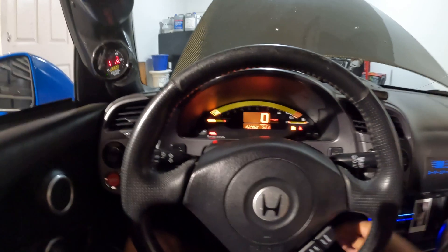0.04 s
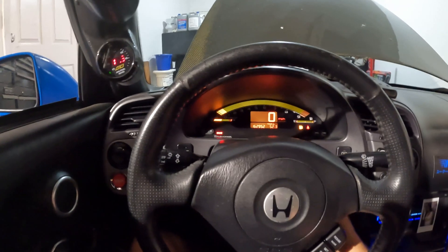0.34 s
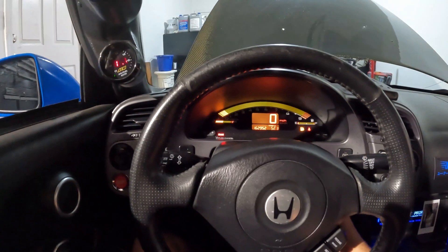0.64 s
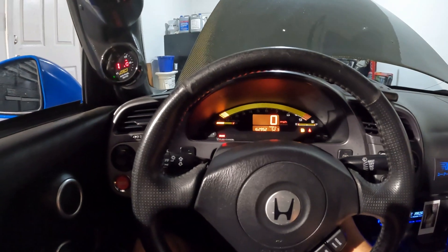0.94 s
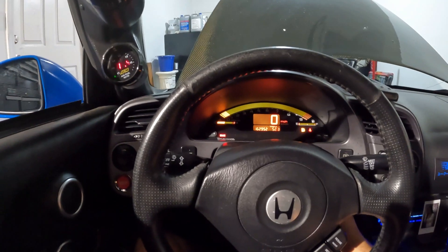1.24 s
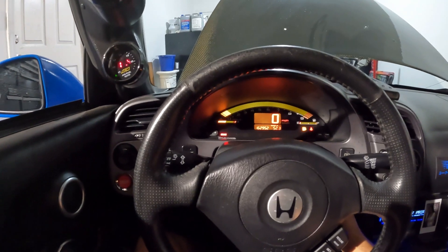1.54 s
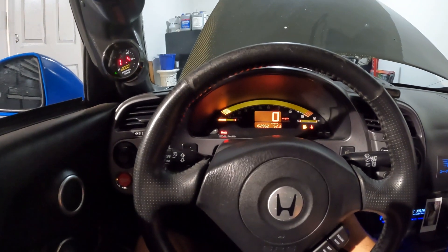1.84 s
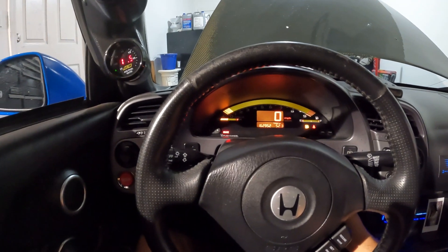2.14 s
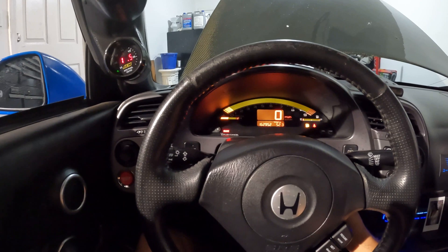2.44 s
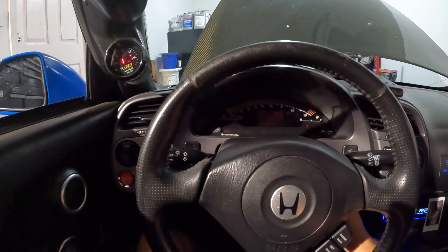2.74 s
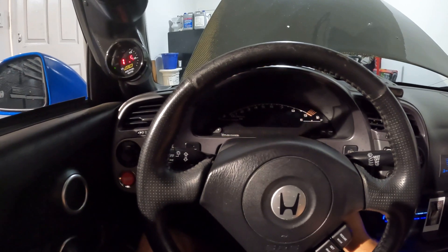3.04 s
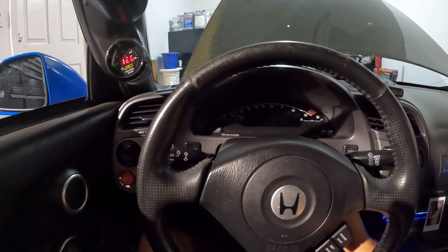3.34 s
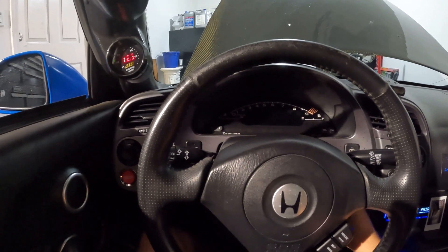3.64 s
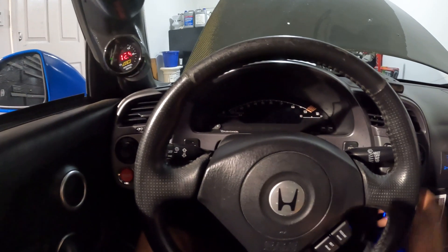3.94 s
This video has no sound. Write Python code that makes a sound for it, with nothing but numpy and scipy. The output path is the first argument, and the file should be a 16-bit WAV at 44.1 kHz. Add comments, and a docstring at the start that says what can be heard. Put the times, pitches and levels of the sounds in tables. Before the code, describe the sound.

A car engine idles with a low hum, then a key clicks and it stops.

```python
"""Idling car, switched off

A four-cylinder car in a garage, heard close in stereo from the driver's seat as a low, steady hum.
Firings boom in the cabin, the engine's drives whine, whirr and rustle, and a hiss follows the speed.
Near 2.9 s the ignition switch clicks off in the steering column. The slack gears chatter and the
engine runs down in about a second, rocking on its mounts."""
import sys
import numpy as np
from scipy import signal
from scipy.fft import rfft, irfft
from scipy.io import wavfile
from scipy.ndimage import uniform_filter1d

SR = 44100
rng = np.random.default_rng(int(sys.argv[2]) if len(sys.argv) > 2 else 0)


def store_wav(level_fs):
    """Save 16-bit WAV to argv[1]."""
    pcm = np.round(np.clip(np.atleast_2d(level_fs), -1, 1) * 32767)
    wavfile.write(sys.argv[1], SR, pcm.T.astype(np.int16))


N = 176400
TIME_S = np.arange(N) / SR

# engine speed: time_s, firings_per_s
FIRING_RATE = [(0.0, 35.0), (0.35, 34.92), (0.55, 35.5), (0.68, 35.12), (0.85, 35.78), (1.15, 36.31),
               (1.8, 35.44), (2.0, 35.28), (2.2, 35.1), (2.45, 35.62), (2.82, 35.72), (2.9, 31.75),
               (3.0, 28.17), (3.15, 22.98), (3.5, 13.5), (3.95, 2.0)]
# strength of the exhaust pulses: time_s, relative_db
PULSE_STRENGTH = [(0, -1.8), (1.15, -1), (2.1, -2), (2.82, -1), (2.93, 1), (3.14, 2), (3.25, -5),
                  (3.5, -20), (3.68, -34), (4.0, -29)]
# response of exhaust and cabin to one pulse: frequency_hz, relative_db
CABIN_RESPONSE = [(10, -29), (19, -0.5), (26, 2.5), (36, 3), (50, -7.5), (70, 2), (88, -15.5), (103, -23),
                  (110, -8), (142, -21), (178, -19), (213, -26), (250, -24.5), (285, -38), (355, -32),
                  (430, -55.5), (650, -23.5), (1200, -60.5)]
# uneven rumble under the firings: frequency_hz, relative_db
RUMBLE_SPECTRUM = [(12, -34.5), (25, -44), (55, 7), (90, -27), (125, 3.5), (190, -8.5), (260, -8.5),
                   (400, -28.5), (800, -52)]
# tones of crank and gears: cycles_per_crank_turn, level_db, flutter_share
GEAR_TONES = [(9, -46.5, 0.3), (11, -46.5, 0.3), (13, -49.5, 0.25), (26, -39, 0.096), (28, -52.5, 0.77),
              (52, -49, 0.51), (56, -56, 0.36), (60, -61.5, 0.41)]
# tones of the belt-driven pulleys: cycles_per_crank_turn, level_db, flutter_share
PULLEY_TONES = [(22.3, -50, .4), (35.5, -56, .5), (41.8, -57, .5)]
# resonances that the moving parts ring: pitch_hz, width_hz, level_db, throb_share
WHIRR_MODES = [(486.7, 93, -44.5, 0), (955.3, 152, -47, 0), (1069, 106, -53.5, 0.2), (1740, 370, -55, 0.6)]
# rustle of valve gear and belts: frequency_hz, relative_db
RUSTLE_SPECTRUM = [(100, 1.5), (260, -4.5), (400, 0), (560, -2.5), (800, -8), (1060, -6), (1280, -9.5),
                   (1600, -3.5), (1900, -4.5), (2400, -9.5), (2750, -8), (3300, -14.5), (5000, -18),
                   (8000, -44), (14000, -47)]
# hiss of belts and air: frequency_hz, relative_db
HISS_SPECTRUM = [(100, -2), (400, 0.5), (750, 4), (1100, 6), (2000, 0), (3500, -0.5), (4400, 0), (5600, -1),
                 (6600, -4.5), (7800, -7.5), (8600, -16), (10500, -15), (11300, -19), (12800, -16.5),
                 (13600, -41)]
# the ignition switch's snap and bounces: start_s, relative_db
SWITCH_CONTACTS = [(2.8989, 0), (2.9020, -7), (2.9046, -5), (2.9060, -6), (2.9088, -10)]
# resonances that each contact rings: pitch_hz, width_hz, relative_db
SWITCH_MODES = [(5540, 440, 0), (5800, 420, -11.5), (7000, 310, -8.5), (7400, 540, -3.5), (8740, 290, -16),
                (10700, 520, -12), (12340, 300, -19)]
# the lock barrel's knock in the steering column: frequency_hz, relative_db
KNOCK_SPECTRUM = [(300, -4), (750, -7), (1100, -2), (1900, 0.5), (2700, -7), (4200, -5.5), (8000, -27)]
# last compressions of the coasting engine: start_s, relative_db
COMPRESSIONS = [(3.17, -16.5), (3.282, -16.5), (3.37, -20.5), (3.433, -16), (3.544, -21), (3.654, -32),
                (3.745, -28.5), (3.87, -27.5)]
# low modes of the car's body: pitch_hz, width_hz, relative_db
BODY_MODES = [(25.4, 11.6, 1), (67.45, 13.8, -3), (113.8, 16, -14), (162.3, 27, -14)]
# stereo image at the seat: frequency_hz, correlation, left_minus_right_db
STEREO_IMAGE = [(148, 0.78, 1.5), (366, 0.85, 2), (670, 0.83, 4), (1220, 0.69, 5), (2580, 0.2, 4),
                (4540, 0.77, 1), (7400, 0.53, 4), (13000, 0.32, 8)]

UNLOAD_S, CUT_S, CUT_FADE_S = 2.81, 2.87, 0.12  # gears unload, firing stops; time each takes to set in


def undb(db):
    return 10 ** (np.asarray(db) / 20)


def unit(x):
    return x / np.sqrt(np.mean(x ** 2))


def noise():
    return rng.standard_normal((2, N))


def since(start_s):
    return np.maximum(TIME_S - start_s, 0)


def curve(rows):
    """Straight lines through rows of time_s, value."""
    return np.interp(TIME_S, *np.array(rows).T)


def per_bin(rows, column=1):
    """A table column read on a log-frequency axis, for a transform of 2 N points."""
    rows = np.array(rows)
    bin_hz = np.arange(N + 1) * SR / (2 * N)
    return np.interp(np.log(bin_hz + 1), np.log(rows[:, 0]), rows[:, column])


def colour(x, rows):
    """Causal filter through rows of frequency_hz, relative_db; the result has an RMS of 1."""
    cepstrum = irfft(np.log(undb(per_bin(rows))))
    cepstrum[1:N] *= 2
    cepstrum[N + 1:] = 0
    running = np.concatenate([x, x[..., ::-1]], axis=-1)  # the sound is already under way at the start
    return unit(irfft(rfft(running) * np.exp(rfft(cepstrum)))[..., :N])


def resonate(x, hz, width):
    """A steep-sided resonance: the same band-pass twice."""
    band = signal.iirpeak(hz, hz / width, fs=SR)
    return signal.lfilter(*band, signal.lfilter(*band, x))


def ringing(t, hz, width):
    """A struck mode: it swells briefly and dies away."""
    age = np.pi * width * t
    return age * np.exp(1 - age) * np.sin(2 * np.pi * hz * t)


def wander(rate_hz):
    """Smooth random drift with an RMS of 1."""
    hold = int(SR / rate_hz)
    steps = np.repeat(rng.standard_normal(400)[np.arange(N // hold + 1) % 400], hold)
    return unit(uniform_filter1d(uniform_filter1d(steps, hold), hold)[:N])


def strikes(times, sizes):
    """Impulses at the given times, each shared between two samples."""
    at = np.clip(times * SR, 0, N - 2)
    i = at.astype(int)
    return np.bincount(i, sizes * (1 - at + i), N) + np.bincount(i + 1, sizes * (at - i), N)


def spread(pair):
    """Turns two unrelated sounds into a left and a right that are alike in the bass."""
    mid, side = rfft(pair, 2 * N)
    alike = np.clip(per_bin(STEREO_IMAGE), 0, 1)
    sign = np.array([[1], [-1]])
    channels = mid * np.sqrt((1 + alike) / 2) + sign * side * np.sqrt((1 - alike) / 2)
    balance = undb(sign * per_bin(STEREO_IMAGE, column=2) / 2)
    return irfft(channels * balance)[:, :N]


def exhaust(firings, speed, jitter_cycles=0.004, overtone_loss_db=-1.15):
    """A pulse per firing booms in the cabin over a faint rumble; without ignition it turns round."""
    angle = 2 * np.pi * (firings + jitter_cycles * wander(30.03))
    coasting = np.minimum(since(CUT_S) / CUT_FADE_S, 1)
    pulses = sum(np.cos(k * angle) * undb(overtone_loss_db * (k + 0.5) * coasting) for k in range(1, 13))
    lope = 1 + 0.02 * (np.cos(angle / 2) + np.sin(angle / 4))  # the four cylinders differ
    strength = undb(curve(PULSE_STRENGTH) + 0.29 * wander(26.66))
    boom = colour(pulses * lope * strength, CABIN_RESPONSE)
    rumble = colour(rng.standard_normal(N), RUMBLE_SPECTRUM) * speed ** 1.17
    return boom * undb(-15) + rumble * undb(-38)


def whine(firings, fade_db_per_s=132):
    """Fluttering gear and pulley tones, locked to the crank, which turns once per two firings."""
    crank = np.pi * firings
    tones = np.zeros(N)
    for order, db, flutter in GEAR_TONES + PULLEY_TONES:
        in_phase = (1 + flutter * wander(22.14)) * np.sin(order * crank)
        quadrature = flutter * wander(20) * np.cos(order * crank)
        tones += undb(db) * (in_phase + quadrature)
    throb = 1 + 0.026 * np.cos(2 * crank)
    fade = undb(-fade_db_per_s * since(UNLOAD_S))
    return spread(np.array([tones * throb * fade, np.zeros(N)]))


def whirr(throb, speed):
    """Moving parts ring noisy resonances; the upper ones throb with the firings."""
    bands = sum(undb(db) * unit(resonate(noise(), hz, 0.64 * width) * (1 + depth * throb))
                for hz, width, db, depth in WHIRR_MODES)
    return bands * speed ** 1.8


def valve_gear(firings, throb, speed, tick_decay_s=0.0043):
    """Valve gear and belts rustle, and the valves tick unevenly, four times per firing."""
    rustle = colour(noise() * (1 + 0.048 * throb), RUSTLE_SPECTRUM) * undb(-39 + 0.67 * wander(14))
    times = np.interp(np.arange(0, firings[-1], 1 / 4), firings, TIME_S)
    sizes = undb(4 * rng.standard_normal(1000)[:len(times)])
    t = TIME_S[:N // 50]
    tick = rng.standard_normal((2, len(t))) * np.exp(-t / tick_decay_s)
    bursts = signal.fftconvolve(strikes(times, sizes)[None], tick)[:, :N]
    ticks = colour(np.abs(bursts) * noise(), RUSTLE_SPECTRUM) * undb(-49)
    return (rustle + ticks) * speed ** 1.43


def hiss(speed, dull_hz=7400):
    """Belts and air hiss; the top fades first as the engine slows."""
    bright = colour(noise(), HISS_SPECTRUM) * undb(0.35 * wander(9.47))
    lowpass = signal.butter(6, dull_hz, fs=SR, output="sos")
    dull = signal.sosfilt(lowpass, colour(noise(), HISS_SPECTRUM))
    brightness = np.clip(speed / 0.58, 0, 1) ** 3  # falls below 58% of idle speed
    blend = bright * np.sqrt(brightness) + dull * np.sqrt(1 - brightness)
    return blend * undb(-44.5) * speed ** 0.82


def machinery(firings, speed, surge, stop_s=3.79, fade_db_per_s=15):
    """Whirr, valve gear and hiss as they reach the seat, dying away as the crank stops."""
    angle = 2 * np.pi * firings
    throb = np.cos(angle) + 0.24 * np.cos(angle / 2) + 0.48 * np.cos(angle / 4)
    parts = surge * whirr(throb, speed) + valve_gear(firings, throb, speed) + hiss(speed)
    return spread(parts) * undb(-fade_db_per_s * since(stop_s))


def gear_rattle(speed):
    """Unloaded gears run slack and chatter softly, less as they slow."""
    slack = np.minimum(since(UNLOAD_S) / CUT_FADE_S, 1)
    chatter = unit(resonate(noise(), hz=395, width=260))
    return spread(chatter * slack * speed ** 2 * undb(-44.5 + 1.5 * wander(25)))


def ignition_switch(contact_decay_s=0.0011, cabin_t60_s=0.14, cabin_db=-9):
    """The snap rings the switch; each contact scrapes its modes too, and the cabin answers briefly."""
    t = TIME_S[:N // 16]
    times, levels_db = np.array(SWITCH_CONTACTS).T
    contact_power = np.convolve(strikes(times, undb(levels_db) ** 2), np.exp(-2 * t / contact_decay_s))[:N]
    tail = undb(-60 * t / cabin_t60_s) ** 2
    echo_power = np.abs(signal.fftconvolve(contact_power, tail / tail.sum())[:N]) * undb(cabin_db) ** 2
    scrape = np.sqrt(contact_power + echo_power) * noise()
    ring = sum(undb(db) * np.sqrt(SR / 2 / width) * resonate(scrape, hz, 2 * width)
               for hz, width, db in SWITCH_MODES)
    snap = sum(undb(db) * ringing(since(times[0]), hz, width) for hz, width, db in SWITCH_MODES)
    return spread(ring * undb(-20.5) + np.array([snap, np.zeros(N)]) * undb(-14.5))


def barrel_knock(start_s=2.901, attack_s=0.00062, t60_s=0.081):
    """The lock barrel knocks; the column's plastic cover gives the click a short, dull body."""
    age = since(start_s)
    burst = spread(colour(noise(), KNOCK_SPECTRUM))
    return burst * np.minimum(age / attack_s, 1) * undb(-26 - 60 * age / t60_s)


def shudder(speed, damping_db_per_octave=14.5):
    """The last compressions rock the engine on its mounts; each swells and fades in the body's modes."""
    times, strength_db = np.array(COMPRESSIONS).T
    slowness = np.clip(1 - np.interp(times, TIME_S, speed), 0, 1) ** 3
    shake = np.zeros(N)
    for hz, width, db in BODY_MODES:
        octaves = np.log2(hz / BODY_MODES[0][0])
        sizes = undb(strength_db + db - damping_db_per_octave * octaves * slowness)
        shake += signal.fftconvolve(strikes(times, sizes), ringing(TIME_S[:N // 8], hz, width))[:N]
    return shake


def scene():
    """The driver's seat: one speed curve drives the engine's sounds, with the switch close by."""
    rate_hz = curve(FIRING_RATE)
    firings = np.cumsum(rate_hz) / SR
    speed = rate_hz / rate_hz[0]  # share of idle speed
    surge = undb(2.5 * np.maximum(rate_hz - 35.95, -0.5))  # whine and whirr swell as the idle creeps up
    engine = exhaust(firings, speed) + surge * whine(firings) + machinery(firings, speed, surge)
    return engine + ignition_switch() + barrel_knock() + gear_rattle(speed) + shudder(speed)


def record(dry, top_hz=13600):
    """The microphone's signal is cut off steeply at the top."""
    return signal.sosfilt(signal.ellip(8, 0.2, 70, top_hz, fs=SR, output="sos"), dry)


dry = scene()
out = record(dry)
store_wav(out)
```